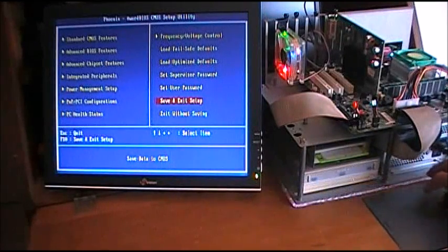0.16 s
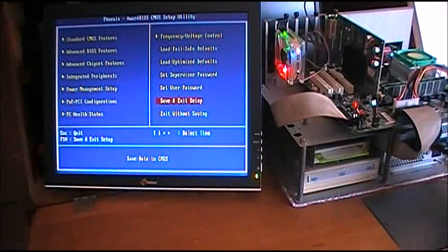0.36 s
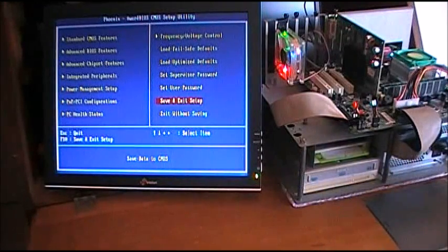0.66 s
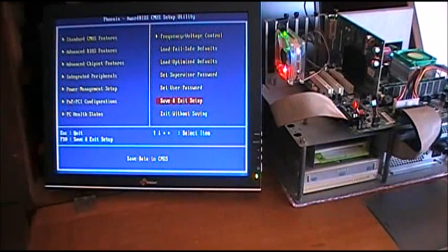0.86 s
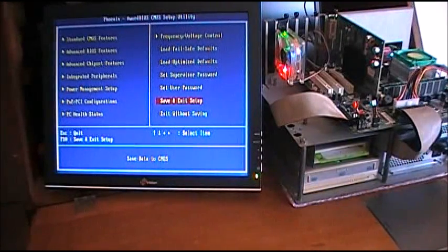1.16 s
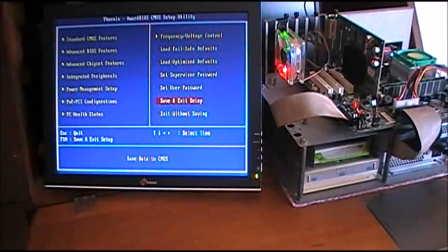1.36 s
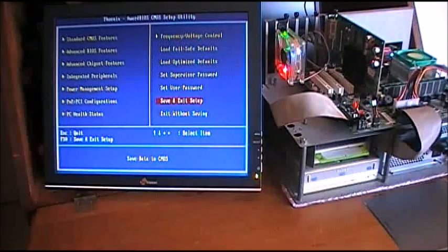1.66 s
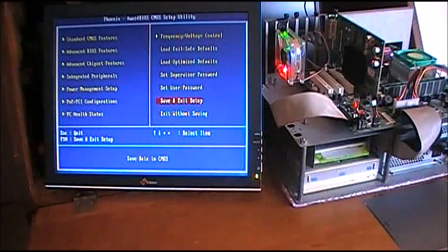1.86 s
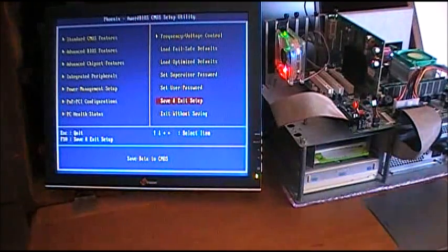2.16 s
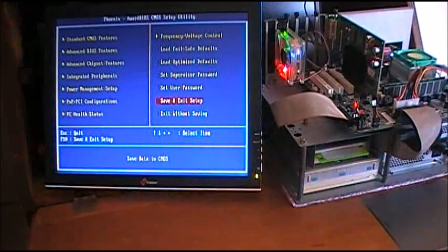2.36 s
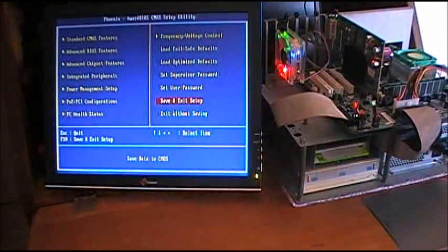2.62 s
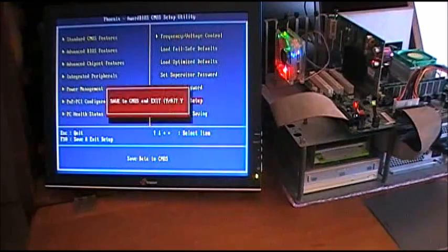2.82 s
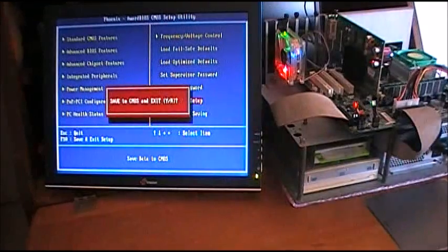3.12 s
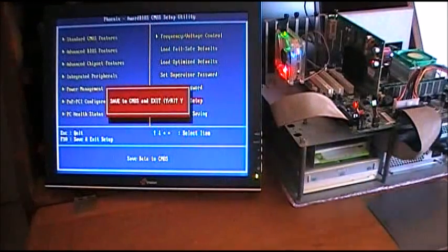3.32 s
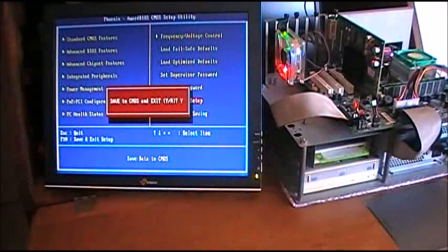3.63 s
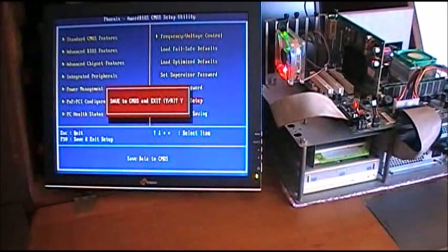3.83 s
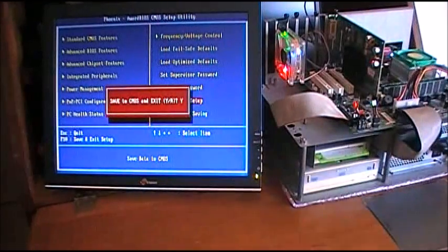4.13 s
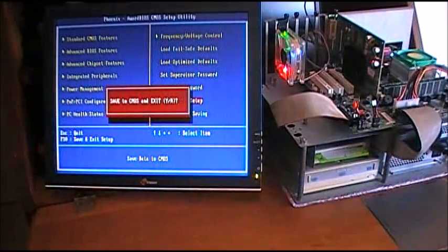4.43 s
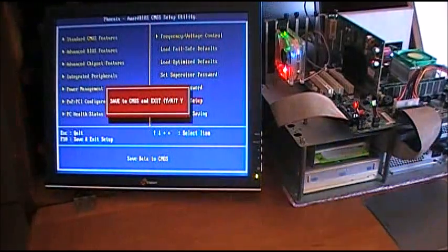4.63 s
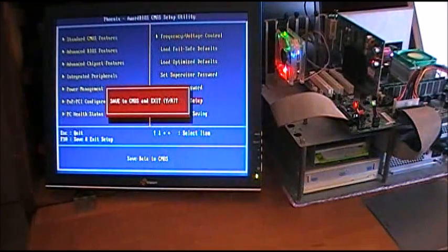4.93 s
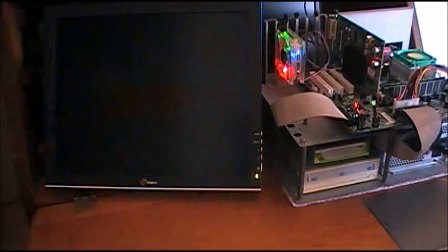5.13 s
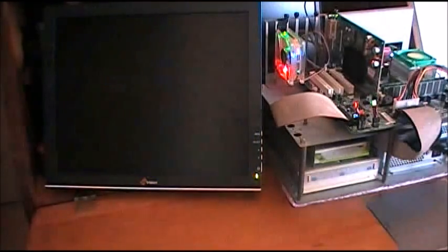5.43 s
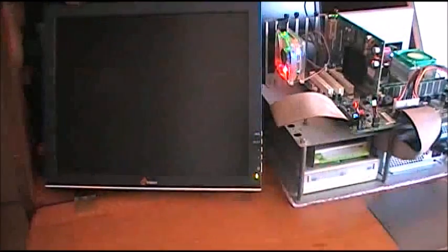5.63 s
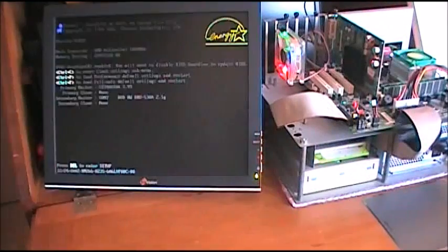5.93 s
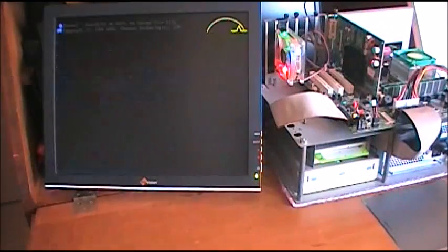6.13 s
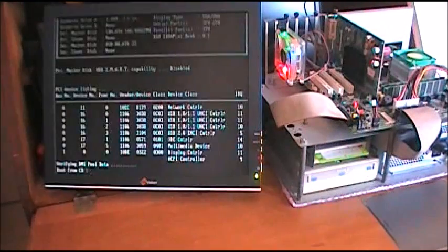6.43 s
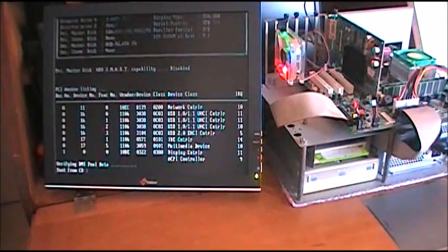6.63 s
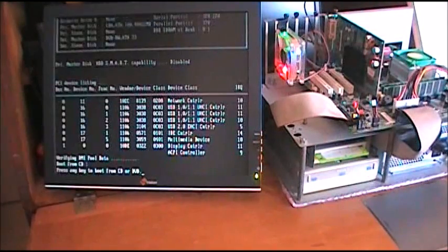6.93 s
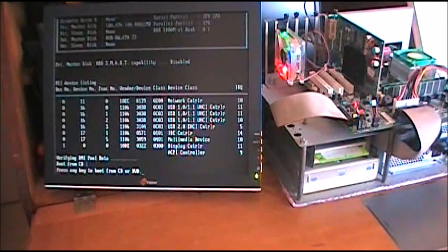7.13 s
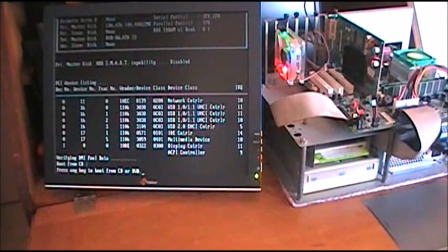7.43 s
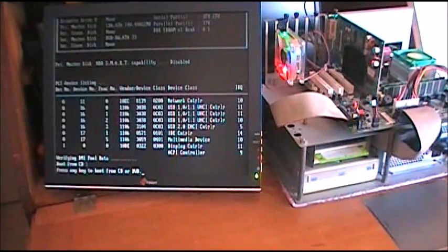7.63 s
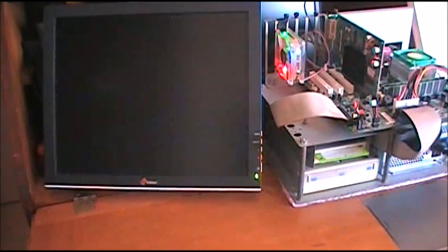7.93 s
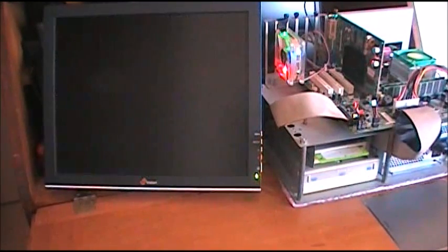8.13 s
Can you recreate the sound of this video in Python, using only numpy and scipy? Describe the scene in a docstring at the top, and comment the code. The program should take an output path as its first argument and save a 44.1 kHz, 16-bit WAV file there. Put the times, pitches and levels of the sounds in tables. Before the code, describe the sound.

Steady airy fan hum with a wavering whine, plastic knocks and a short judder on wood, then three hard, widely spaced key clicks.

```python
"""Two computer fans whir and hum throughout: coloured noise for the air, wavering blade tones, thin whines.
A keyboard is set down on a wooden desk (plastic clacks, wood thuds), then judders into place in nine slips.
After more knocks and soft bumps the sound cuts out for a moment at 1.6 s.
Three keys are struck hard, each a chain of noise bursts through resonances, among further bumps on the desk;
between the second and third the sound cuts out again, at 5.9 s."""
import sys
import numpy as np
from scipy import signal
from scipy.fft import rfft, irfft
from scipy.io import wavfile
from scipy.ndimage import uniform_filter1d

SR = 44100
rng = np.random.default_rng(int(sys.argv[2]) if len(sys.argv) > 2 else 0)


def log_audio(samples):
    """Write samples as a 16-bit WAV file to the path given in sys.argv[1]."""
    # one column per channel
    frames = np.atleast_2d(samples).T
    # limit to full scale, then quantise
    limited = np.clip(frames, -1, 1)
    pcm = np.round(limited * 32767).astype(np.int16)
    wavfile.write(sys.argv[1], SR, pcm)


N = 364707
TIME = np.arange(N) / SR
LOOSE_TICK_HZ = 7650  # tick of the loose keycaps

# spectrum of plastic clatter: freq_hz, relative_density_db
PLASTIC_SPECTRUM = [(40, -47), (120, -27), (300, -19.5), (520, -22), (800, 0.5), (1200, -3.5), (1600, 4.5),
                    (2600, -1.5), (3400, -1), (5000, -1.5), (9900, -29.5)]
# desk modes: freq_hz, width_hz, gain_db
DESK_MODES = [(156, 27, -7), (278, 36, -4), (370, 76, -4), (393, 110, 2), (757, 51, 3)]


def undb(db):
    """Decibels to gain."""
    return 10 ** (np.asarray(db) / 20)


def unit(x):
    """Scale to rms 1."""
    return x / np.sqrt(np.mean(x ** 2))


def pan(left_minus_right_db):
    """Left and right gains for a level difference."""
    return undb(np.array([[.5], [-.5]]) * left_minus_right_db)


def gains(points, size):
    """A (Hz, dB) table as gains on the bins of a transform, interpolated over log frequency."""
    hz, db = np.transpose(points)
    bins_hz = np.arange(size // 2 + 1) * SR / size
    return undb(np.interp(np.log(bins_hz + 1), np.log(hz), db))


def colour(x, points):
    """Causal minimum-phase filter with the given spectrum, by folding the cepstrum."""
    cepstrum = irfft(np.log(gains(points, size=2048)))
    cepstrum[1:1024] *= 2
    cepstrum[1025:] = 0
    impulse = irfft(np.exp(rfft(cepstrum)))
    return signal.fftconvolve(x, impulse[None], axes=1)[:, :x.shape[1]]


def ring(x, hz, width_hz):
    """One resonance, gain 1 at its centre."""
    return signal.lfilter(*signal.iirpeak(hz, hz / width_hz, fs=SR), x)


def body(x, modes):
    """Resonances side by side; neighbouring modes move in opposite directions."""
    return sum((-1) ** k * undb(db) * ring(x, hz, width_hz) for k, (hz, width_hz, db) in enumerate(modes))


def resonate(x, modes):
    """The direct sound plus the resonances that it excites."""
    return x + sum(undb(db) * ring(x, hz, width_hz) for hz, width_hz, db in modes)


def walk(rate_hz):
    """Smooth random drift with a spread near 1."""
    hold = int(SR / rate_hz)
    steps = np.repeat(rng.standard_normal(N // hold + 1), hold)
    return 1.3 * uniform_filter1d(uniform_filter1d(steps, hold), hold)[:N]


def stereo_noise(size, side):
    """Noise common to both channels plus a part of opposite sign in each."""
    mid, other = rng.standard_normal((2, size))
    return np.array([mid + side * other, mid - side * other])


def place_stereo(x, place):
    """A source off to one side differs between the channels in level and phase, by frequency."""
    hz, left_minus_right_db, left_lag_rad = np.transpose(place)
    bins_hz = np.arange(N // 2 + 1) * SR / N
    phase = np.array([[-.5], [.5]]) * np.interp(bins_hz, hz, left_lag_rad)
    level = pan(np.interp(bins_hz, hz, left_minus_right_db))
    return irfft(rfft(x) * level * np.exp(1j * phase), N)


def add(out, start_s, x):
    """Mix x into out from start_s."""
    i = max(int(start_s * SR), 0)
    out[:, i:i + x.shape[1]] += x[:, :N - i]


def keystrokes():
    """The finger lands, the key bottoms out, rebounds and settles, then springs back when let go."""
    # keystrokes: bottom_s, level_db, key_hz, ring_db, tick_hz, tick_db,
    # settle_after_s, settle_db, release_after_s, release_db (stage levels relative to level_db)
    strokes = [(2.837, -24.5, 2020, -7, 6200, 0, 0.021, -6.5, 0.069, -15),
               (5.0445, -24, 2130, -8, 6170, 1, 0.022, -8, 0.08, -15),
               (7.0685, -26.5, 2380, 3.5, 4660, 1, .0165, -3, .04, -15.5)]
    # colour of each stage: ring_db, thump_db, tick_db, rattle_db (ring and tick add to the key's own)
    touch = (6, -10.5, -8, -2)
    bottom = (-6.5, -21, 1.5, -13)
    rebound = (-1, -16.5, 1, -8.5)
    settle = (-6.5, -27, -5.5, -5.5)
    release = (-12, -14, -4, 0)
    touch_before_s, touch_db = .004, -12
    rebound_after_s, rebound_db = .009, -3
    out = np.zeros((2, N))
    for (bottom_s, level_db, key_hz, key_ring_db, key_tick_hz, key_tick_db,
         settle_s, settle_db, held_s, release_db) in strokes:
        stages = [(-touch_before_s, touch_db, LOOSE_TICK_HZ, touch),
                  (0, 0, key_tick_hz, bottom),
                  (rebound_after_s, rebound_db, key_tick_hz, rebound),
                  (settle_s, settle_db, LOOSE_TICK_HZ, settle),
                  (held_s, release_db, LOOSE_TICK_HZ, release)]
        for after_s, stage_db, tick_hz, (ring_db, thump_db, tick_db, rattle_db) in stages:
            blow = clack(key_hz, key_ring_db + ring_db, thump_db, tick_hz, key_tick_db + tick_db, rattle_db)
            add(out, bottom_s + after_s, undb(level_db + stage_db) * blow)
    return out


def knocks():
    """Each time the keyboard meets the desk, the plastic clacks and the wood thuds."""
    # knocks: start_s, clack_db, clack_hz, ring_db, tick_db, rattle_db, thud_db, thud_hz
    contacts = [(.001, -38, 1300, 0, -7, -1.5, -37.5, 358), (0.0156, -32, 1210, 4, 2, -16, -31, 378),
                (.048, -29.5, 1250, 4.5, 5, -26, -34.5, 410), (.053, -31, 1410, 5.5, -10, -30, -39, 143),
                (.166, -34, 1740, 0, -4.5, -17, -40.5, 700), (.283, -47, 1100, 6.5, -18, -12.5, -42, 750),
                (.365, -45, 1620, -2, -2.5, -2.5, -53, 450), (.695, -52, 1700, 4, -20, -12, -47, 430),
                (1.256, -32, 1820, 3, -0.5, -13, -37.5, 784), (1.258, -34, 2000, 6.5, -8, -16, -45.5, 784),
                (1.2985, -33, 1880, 2.5, -8.5, -12.5, -41.5, 800)]
    out = np.zeros((2, N))
    for start_s, clack_db, clack_hz, ring_db, tick_db, rattle_db, thud_db, thud_hz in contacts:
        blow = clack(clack_hz, ring_db, -14.5, LOOSE_TICK_HZ, tick_db, rattle_db)
        add(out, start_s, undb(clack_db) * blow)
        add(out, start_s, undb(thud_db) * thud(thud_hz, decay_s=0.026))
    return out


def slide(count=9):
    """The keyboard's feet stick and slip over the desk, unevenly and on average ever more weakly."""
    start_s, gap_s, jitter_s, decay_s = .427, .037, .004, 0.019
    start_db, fade_db_per_s, scatter_db = -40.5, 25, 1.5
    centre_hz, scatter_octaves = 705, 0.17
    out = np.zeros((2, N))
    for k, (late, strong, high) in enumerate(rng.standard_normal((count, 3))):
        after_s = k * gap_s + jitter_s * late
        level_db = start_db - fade_db_per_s * after_s + scatter_db * strong
        hz = centre_hz * 2 ** (scatter_octaves * high)
        add(out, start_s + after_s, undb(level_db) * thud(hz, decay_s))
    return out


def bumps():
    """Lone soft contacts and scuffs on the desk."""
    # bumps: start_s, level_db, pitch_hz, decay_s
    contacts = [(1.302, -50.5, 171, 0.036), (2.19, -41, 506, 0.013), (3.808, -58, 300, 0.21),
                (4.515, -43, 447, .0069), (6, -50, 301, 0.038), (6.21, -58, 334, .04)]
    out = np.zeros((2, N))
    for start_s, level_db, pitch_hz, decay_s in contacts:
        add(out, start_s, undb(level_db) * thud(pitch_hz, decay_s))
    return out


def clack(hz, ring_db, thump_db, tick_hz, tick_db, rattle_db, contact_db=13, crack_s=0.0037,
          rattle_s=0.028, room_s=0.069, room_db=-25, grain_db=3, part_width_hz=900, tick_width_hz=2200,
          near_side=0.16, far_side=0.43):
    """A blow snaps on contact, shakes the loose keycaps into a short rattle and dies away in the room."""
    t = TIME[:SR // 2]
    # the rattle's level jumps every 32 samples
    grains = unit(undb(grain_db * np.repeat(rng.standard_normal(len(t)), 32)[:len(t)]))
    crack = stereo_noise(len(t), near_side) * np.exp(-t / crack_s)
    crack[:, 0] += undb(contact_db)
    rattle = undb(rattle_db) * grains * np.exp(-t / rattle_s)
    room = undb(room_db) * np.exp(-t / room_s)
    force = crack + (rattle + room) * stereo_noise(len(t), far_side)
    blow = unit(colour(force, PLASTIC_SPECTRUM))
    blow += undb(ring_db) * unit(ring(ring(force, hz, part_width_hz), hz, part_width_hz))
    blow += undb(thump_db) * unit(body(force, DESK_MODES))
    blow += undb(tick_db) * unit(ring(force, tick_hz, tick_width_hz))
    return blow * np.sqrt(np.mean(force ** 2))


def thud(hz, decay_s, relative_width=0.27, desk_db=-7, grit_db=-7, attack_s=0.0009, side=0.27):
    """A soft contact pushes the desk top for longer, so its low modes answer, with a little scraping grit."""
    t = TIME[:SR // 2]
    push = np.exp(-t / decay_s) * (1 - np.exp(-t / attack_s))
    force = stereo_noise(len(t), side) * push
    width_hz = relative_width * hz
    wood = unit(ring(ring(force, hz, width_hz), hz, 2 * width_hz))
    wood += undb(desk_db) * unit(body(force, DESK_MODES))
    wood += undb(grit_db) * unit(colour(force, PLASTIC_SPECTRUM))
    return unit(wood) * np.sqrt(np.mean(push ** 2))


def from_keyboard(x, lowest_hz=130):
    """Every contact rings the shell; the small desk radiates little deep bass."""
    # longer rings of the keyboard's shell: freq_hz, width_hz, gain_db
    shell = [(1172, 63, -1), (2190, 49, -1.5), (2435, 16, -5), (2690, 110, -0.5), (3070, 8.6, -3.5),
             (4350, 97, -11.5), (5590, 72, -1), (8370, 250, -6.5)]
    # keyboard's stereo place: freq_hz, left_minus_right_db, left_lag_rad
    place = [(100, 3.5, .05), (500, 6.5, 0.18), (1800, 4, 0.15), (4500, 2, 0.16), (9000, 1.5, 1)]
    bass_cut = signal.butter(1, lowest_hz, "high", fs=SR, output="sos")
    return place_stereo(signal.sosfilt(bass_cut, resonate(x, shell)), place)


def air(level_db=-48.48, flutter_db=0.3):
    """Turbulence behind the blades, coloured by the boards around it."""
    # rush of air: freq_hz, relative_density_db
    spectrum = [(18, -75.5), (30, -47), (117, -24.5), (230, -20), (254, -19), (323, -12), (565, -11),
                (638, -8.5), (775, -13), (833, -6), (896, -8), (1350, -6), (1600, -4), (8350, -24),
                (9900, -29.5), (12900, -64), (21800, -120)]
    # part of opposite sign in each channel: freq_hz, level_against_common_part_db
    side_spectrum = [(60, -0.5), (130, 7.5), (300, 2.5), (600, -2), (1150, -8), (2400, -10), (5000, -10.5),
                     (10000, -7)]
    # resonances of boards and heat sink: freq_hz, width_hz, gain_db
    cavities = [(626, 20, -15.5), (1117, 18, -1.5), (1450, 91, -7.5), (2184, 74, -7), (3536, 510, -2.5),
                (7000, 1330, -1), (8840, 1420, 2.5)]
    # air's stereo place: freq_hz, left_minus_right_db, left_lag_rad
    place = [(100, 2.5, .1), (340, 2.5, 0.49), (1060, 5.5, 0.32), (1900, 4.5, 0.34), (3400, 3, 0.61),
             (5900, 0.2, .15), (9000, 2, 0.38)]
    mid, side = rfft(rng.standard_normal((2, N)))
    side = side * gains(side_spectrum, N)
    rush = irfft(np.array([mid + side, mid - side]) * gains(spectrum, N), N)
    rush = unit(place_stereo(resonate(rush, cavities), place))
    return rush * undb(level_db + flutter_db * walk(40))


def fan_tone(hz, level_db, overtones, wander, waver_db, pan_db):
    """Blades pass the struts at a slightly unsteady rate; each overtone wavers in the turbulent inflow."""
    phase = 2 * np.pi * np.cumsum(hz * (1 + wander * (walk(2) + walk(25)))) / SR
    tone = undb(level_db) * np.sin(phase)
    for multiple, db in overtones:
        tone += undb(db + waver_db * walk(9)) * np.sin(multiple * phase)
    return np.sqrt(2) * tone * pan(pan_db)  # levels are rms


def large_fan():
    """Low blade tone whose fundamental fades slowly and evenly."""
    # overtones: multiple, level_db
    overtones = [(2, -69), (3, -70), (4, -63)]
    start_db, fade_db_per_s = -66, 1.06
    level_db = start_db - fade_db_per_s * TIME
    return fan_tone(329.8, level_db, overtones, wander=0.00135, waver_db=1.5, pan_db=10)


def small_fan():
    """Higher blade tone whose fundamental swells and sinks."""
    # level of the fundamental: time_s, level_db
    swell = [(0, -55), (.93, -60), (1.12, -63.5), (1.9, -69), (2.35, -58.5), (2.58, -66.5), (3.4, -57),
             (3.6, -67.5), (4.62, -62.5), (4.77, -58.5), (5.55, -61.5), (5.95, -54.5), (6.33, -65.5),
             (6.68, -56.5), (7, -59.5), (8.27, -58.5)]
    # overtones: multiple, level_db
    overtones = [(2, -66), (3, -71), (4, -76)]
    level_db = np.interp(TIME, *np.transpose(swell))
    return fan_tone(845.3, level_db, overtones, wander=.0024, waver_db=5.5, pan_db=7.5)


def whines(waver_db=4.0, pan_db=3):
    """Thin tones of motors and bearings, unsteady in pitch and level."""
    # whines: pitch_hz, level_db, wander_hz
    partials = [(91.5, -92, .3), (199.2, -84, .5), (231, -82, .5), (1130, -74, 6), (1384, -65, 5),
                (5647, -81, 10), (6234, -83, 4), (8570, -87, 5)]
    tones = np.zeros(N)
    for pitch_hz, level_db, wander_hz in partials:
        level = undb(level_db + waver_db * walk(16))
        phase = 2 * np.pi * np.cumsum(pitch_hz + wander_hz * walk(30)) / SR
        tones += level * np.sin(phase)
    return np.sqrt(2) * tones * pan(pan_db)


def scene():
    """The running machine with the keyboard in front of it."""
    keyboard = from_keyboard(keystrokes() + knocks() + slide() + bumps())
    return keyboard + air() + large_fan() + small_fan() + whines()


def record(dry, top_hz=9980):
    """The sound is muted in two short gaps, then its treble is cut steeply."""
    # silent gaps: start_s, end_s
    gaps = [(1.5885, 1.6697), (5.926, 6.007)]
    live = np.ones(N)
    for start_s, end_s in gaps:
        live[(TIME > start_s) & (TIME < end_s)] = 0
    treble_cut = signal.ellip(12, .1, 70, top_hz, fs=SR, output="sos")
    return signal.sosfilt(treble_cut, dry * live)


dry = scene()
out = record(dry)
log_audio(out)
```